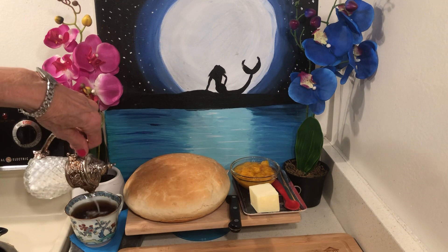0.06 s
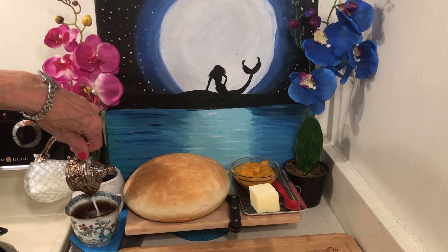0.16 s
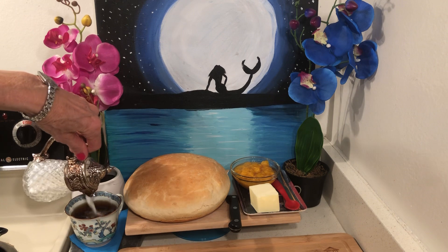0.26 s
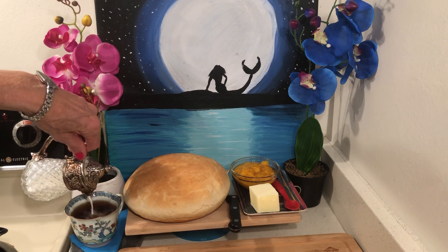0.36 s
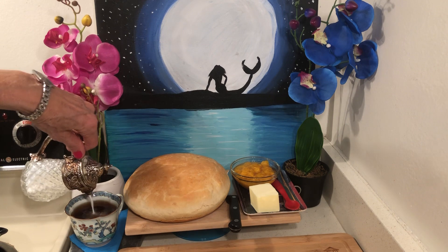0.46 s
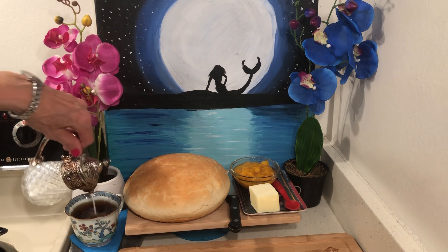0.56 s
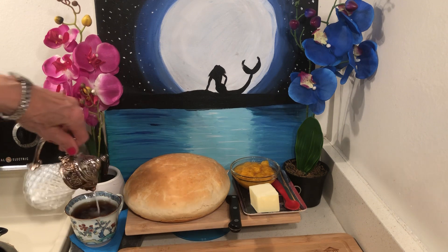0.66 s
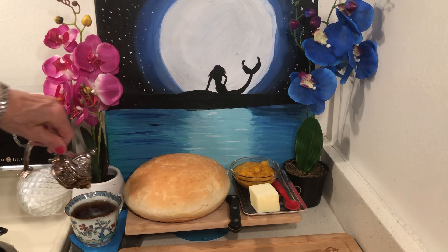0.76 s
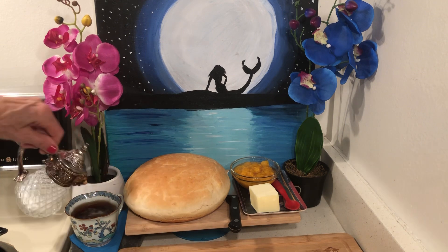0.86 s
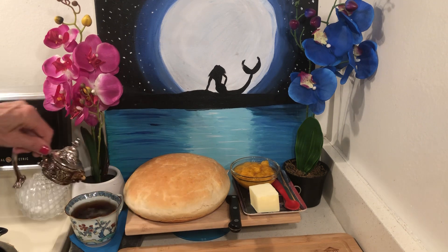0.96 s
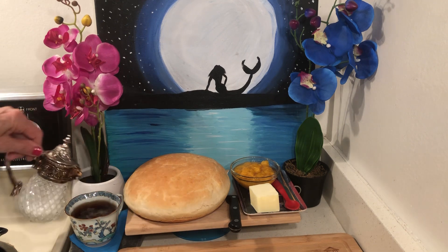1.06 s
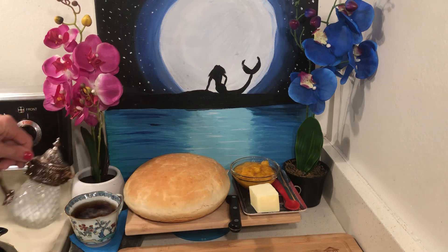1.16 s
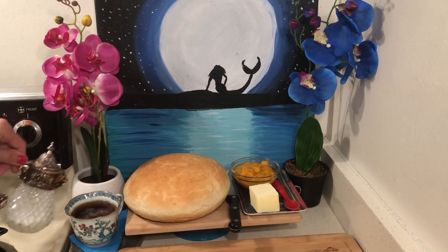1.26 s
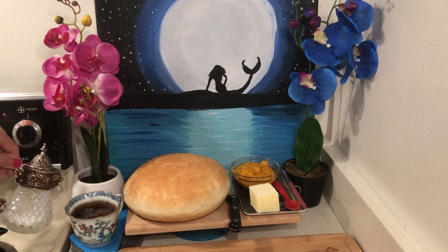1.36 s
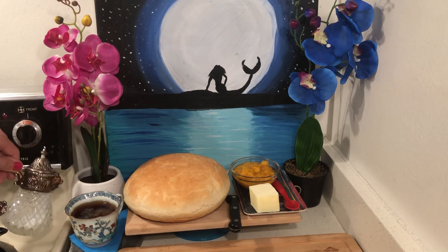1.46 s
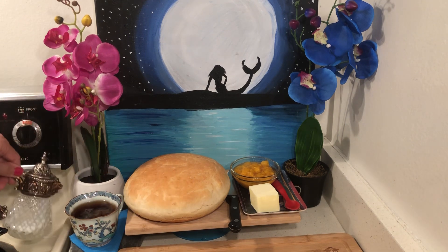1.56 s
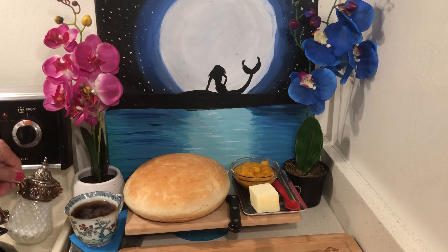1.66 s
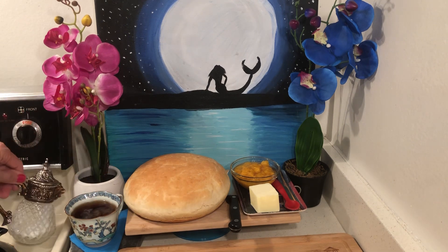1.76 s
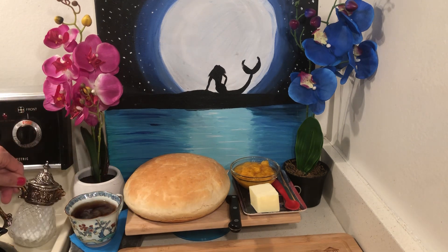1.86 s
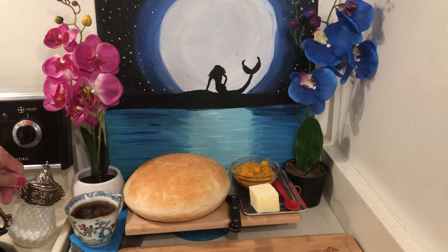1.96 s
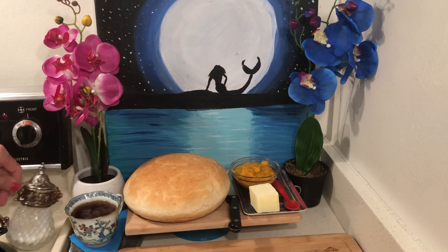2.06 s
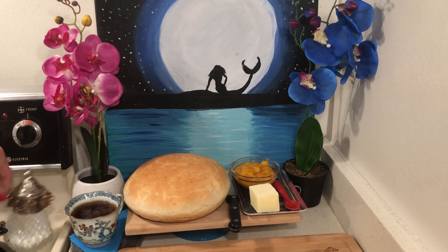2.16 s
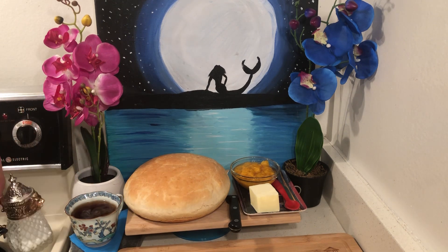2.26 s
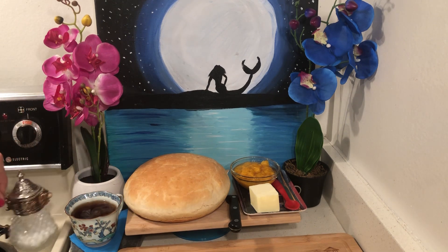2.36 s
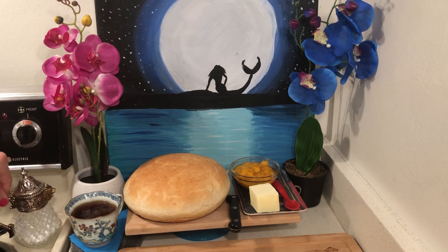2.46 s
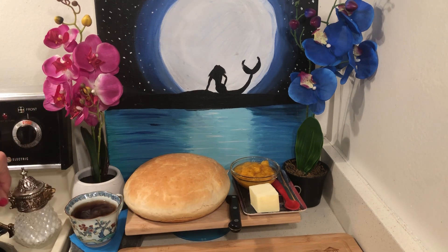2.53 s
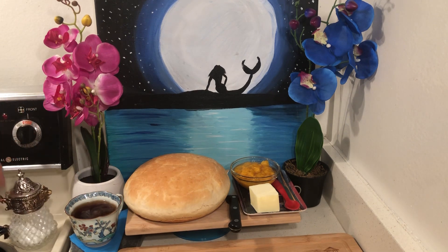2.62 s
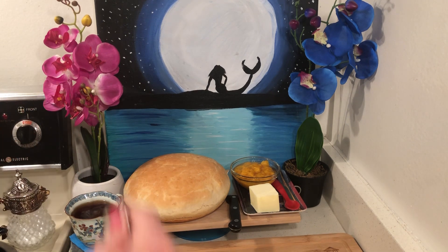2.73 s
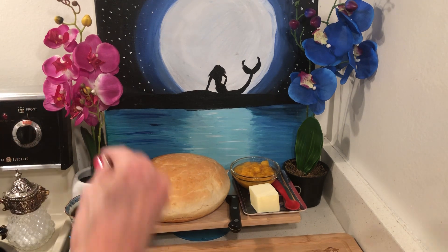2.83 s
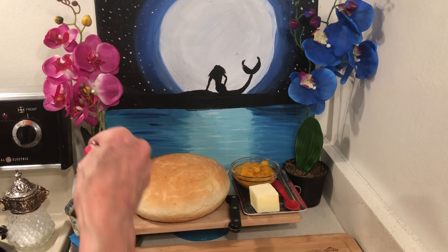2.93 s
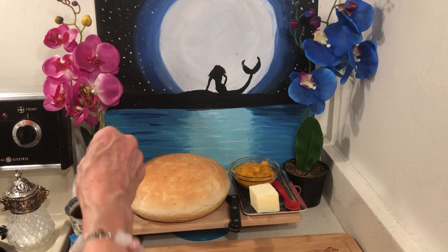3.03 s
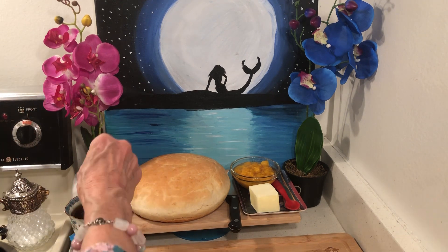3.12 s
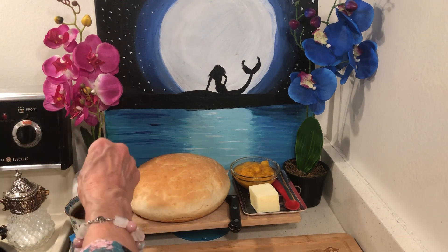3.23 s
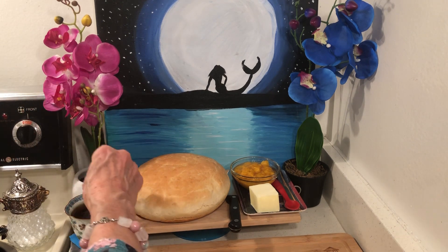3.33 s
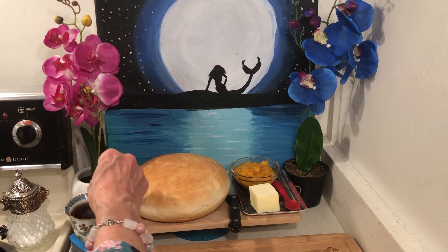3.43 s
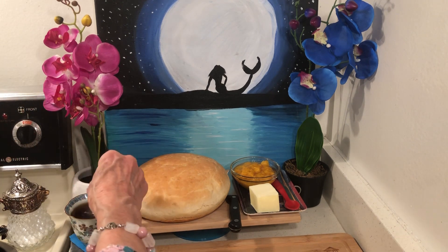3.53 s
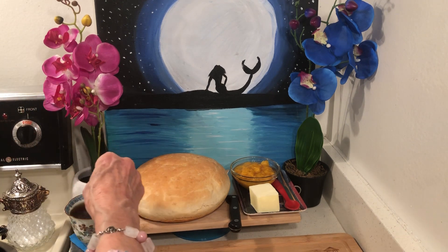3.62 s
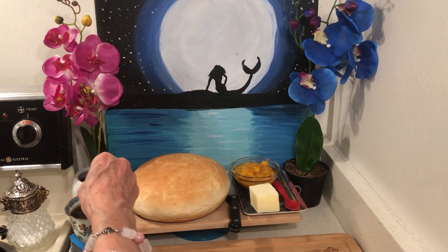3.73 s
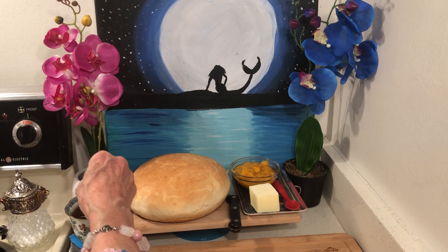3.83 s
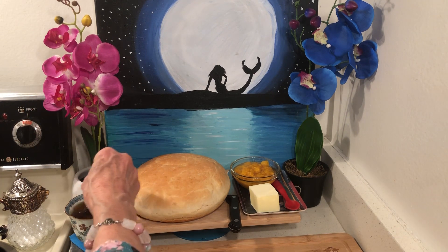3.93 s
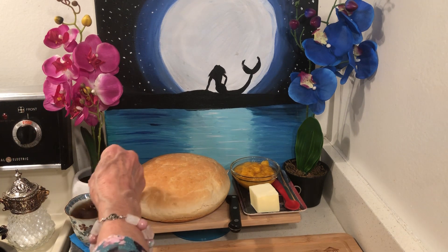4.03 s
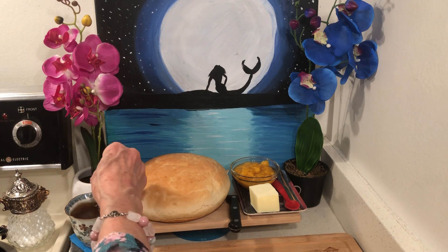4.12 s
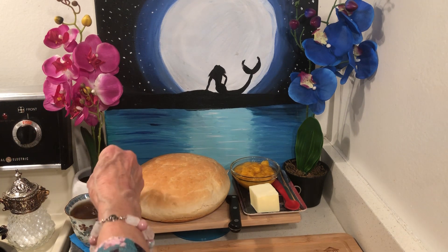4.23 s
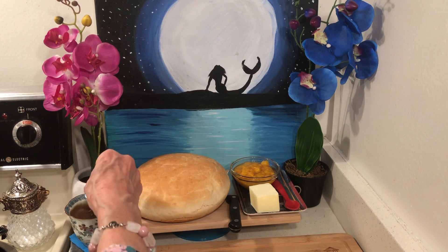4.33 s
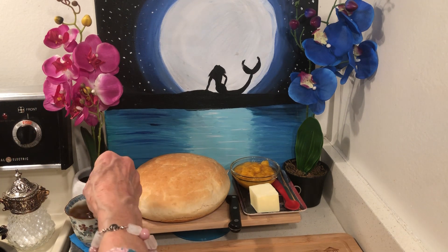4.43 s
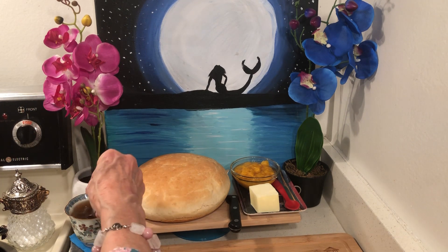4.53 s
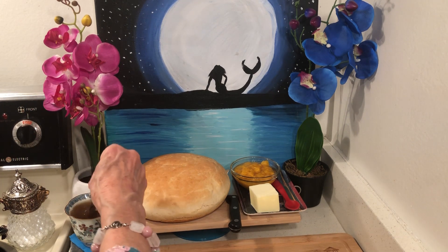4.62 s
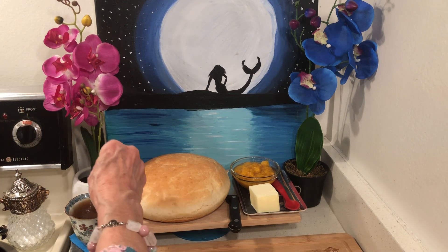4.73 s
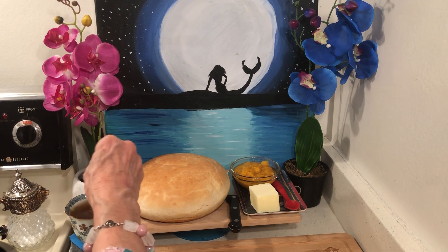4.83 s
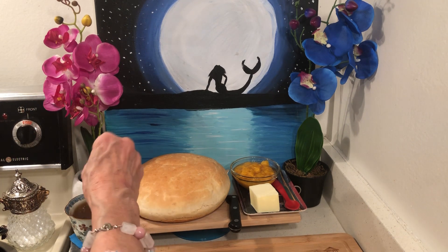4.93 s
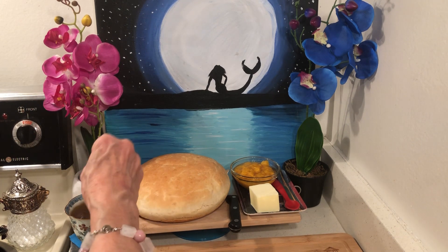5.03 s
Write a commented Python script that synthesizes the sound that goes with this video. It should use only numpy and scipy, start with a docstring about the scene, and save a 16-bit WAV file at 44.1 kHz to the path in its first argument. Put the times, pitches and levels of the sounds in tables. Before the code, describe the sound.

Last tea drops plink into a china cup, a small metal-lidded pot claps and thuds onto a counter, then a spoon chinks and stirs.

```python
"""Over air noise and an appliance hum near a kitchen corner, the last drops of tea fall into a china cup. A
small glass and metal teapot is tipped upright, its lid falls shut; it is set down, rocks and slides. Then a
spoon chinks the cup, knocks its bottom and stirs while a bracelet ticks. Lid, cup and links are dying sines,
drops and stirring plops are rising bubble tones, knocks are paired contacts of modes and rattle, rubs are dense
noise."""
import sys
import numpy as np
from scipy import signal
from scipy.fft import rfft, irfft
from scipy.io import wavfile

SR = 44100
rng = np.random.default_rng(int(sys.argv[2]) if len(sys.argv) > 2 else 0)


def inscribe(sig):
    """Save sig as 16-bit PCM at rate SR to the path in sys.argv[1].

    A 1-D sig is mono; a 2-D sig holds one channel per row.
    Samples are clipped to [-1, 1] before scaling.
    """
    pcm = np.round(np.clip(np.atleast_2d(sig).T, -1, 1) * 32767)
    wavfile.write(sys.argv[1], SR, pcm.astype(np.int16))


N = 224142

# Steady air noise. Each row: frequency in Hz, relative level in dB per Hz.
AIR_SPECTRUM = [(20, -18), (45, -14.5), (80, 5), (130, -5.5), (180, -2.5), (270, 2), (340, -5), (420, -2.5),
                (600, -6.5), (1200, -9.5), (2500, -19.5), (6000, -27.5), (10000, -37.5), (16000, -42)]
# Appliance hum. Each row: frequency in Hz, level in dB rms, width of the wavering in Hz.
HUM_TONES = [(45, -75, 3), (119.8, -56, 9.9), (151.6, -63.5, 2.5), (228, -57, 0.12), (273.6, -67.5, 5.5),
             (415.8, -62, 4.7), (440, -76, 0.85)]
# Kitchen reverberation. Each row: frequency in Hz, time to fall by 60 dB in seconds.
ROOM_DECAY = [(70, 0.88), (150, 0.9), (300, 0.37), (700, 0.35), (1800, 0.32), (5000, 0.3), (13000, 0.18)]
# A tiny hard contact. Each row: frequency in Hz, relative level in dB.
TICK_SPECTRUM = [(300, -92), (1500, 4.5), (3300, 9.5), (6000, 1), (9000, 1.5), (13000, -2.5), (16000, -7)]
# The clearest bracelet ticks. Each row: start in seconds, level in dB.
LINK_TICKS = [(3.706, -51), (3.8452, -69), (4.0897, -60.5), (4.1859, -66), (4.3257, -60.5), (4.7054, -62.5)]
# Link resonances before each link's own detuning. Each row: frequency in Hz, relative level in dB,
# time to fall by 60 dB in seconds.
LINK_MODES = [(7400, -4, 0.039), (8320, -8, 0.04), (9200, -5, 0.037), (9830, 0, 0.082), (11200, 3.5, 0.03),
              (12400, -1, .035), (14000, 3, 0.031), (15100, -2, 0.02)]
# Bubbles in the tea. Each row: start in seconds, nominal pitch in Hz, level in dB.
BUBBLES = [(0.0977, 4170, -59), (0.2022, 2270, -59.5), (0.301, 2690, -54), (0.419, 2640, -63),
           (0.4957, 3450, -54.5), (.531, 1870, -53), (0.792, 6460, -68.5), (3.936, 2085, -56.5),
           (3.939, 4120, -66), (3.983, 4200, -67)]
# Spoon on the cup. Each row: start in seconds, ring level in dB, tick level in dB.
SPOON_CHINKS = [(3.468, -41, -43.5), (3.508, -52, -65), (3.7095, -65, -69), (3.845, -69, -60),
                (4.186, -72, -80)]
# Cup modes. Each row: frequency in Hz, relative level in dB, time to fall by 60 dB in seconds.
CUP_MODES = [(1416, -8, .25), (3348, -2, .29), (3412, 0, .15), (5211, -7, .3), (6002, -11, .18),
             (6799, -16, .18), (8118, -10, .18), (8290, -6, .08), (10300, -16, .14), (11460, -14, .1),
             (14560, -14, .09)]
# The lid falling shut. Each row: start in seconds, ring level in dB, knock level in dB.
LID_CLAPS = [(1.364, -41, -34)]
# Lid modes. Each row: frequency in Hz, relative level in dB, time to fall by 60 dB in seconds.
LID_MODES = [(505, 0, .12), (673, -2, .13), (1098, -2, .17), (1170, -4, .08), (1680, 4, .12),
             (2562, -11, .27), (3080, -7.5, .22), (3200, 2, .05), (4280, -7, .25), (4410, -3, .08),
             (4544, -10, .2), (5520, 1, .06), (5590, -6, .15), (7246, -19, .16), (8608, -22, .14),
             (11430, -27, .12)]
# The lid's hinge settling. Each row: start in seconds, ring level in dB, tick level in dB.
HINGE_SETTLES = [(1.833, -56.5, -61)]
# Hinge modes. Each row: frequency in Hz, relative level in dB, time to fall by 60 dB in seconds.
HINGE_MODES = [(4370, -6.5, 0.094), (5992, -1, 0.07), (6130, 3, 0.077), (7970, -9, .14), (9600, -15, .08),
               (10940, -18, .1)]
# The cabinet booming after the heavy blows. Each row: start in seconds, level in dB.
CABINET_BOOMS = [(1.955, -38), (2.331, -42)]
# The foot rubbing as the pot rocks, then sliding into place. Each row: start in seconds, length in seconds,
# level in dB, treble tilt in dB per octave.
FOOT_SLIDES = [(2.262, 0.33, -50.5, 0), (2.626, 0.15, -39, -5)]
# Knocks that reach the counter, from the pot and last (two rows) from the spoon on the cup's bottom, each
# two contacts. Each row: start in seconds, level of the second contact in dB, gap to it in seconds,
# first contact in dB above the second, mode blend from 0 for the pot's edge to 1 for its flat foot.
COUNTER_KNOCKS = [(1.7438, -35.5, .0093, -5, 0.29), (1.951, -23, 0.0051, 2.5, 0.077),
                  (2.3129, -21, 0.014, -12, 0.8), (2.4199, -30.5, 0.013, -5, 0.93),
                  (2.489, -38.5, 0.0031, 2.5, 1), (2.5017, -25.5, .005, -6, 1),
                  (2.6131, -40.5, 0.0012, -0.5, 0.92), (2.66, -41, .011, 1.5, 0.65),
                  (3.4102, -47.5, 0.02, 3.5, 0.11), (3.843, -59, 0.0011, 6, 0.37)]
# Pot and counter ringing together, before a treble lift. Each row: frequency in Hz,
# relative level in dB struck on the edge, relative level in dB struck on the foot.
KNOCK_MODES = [(158, 7, -2), (291, 4, -2), (377, 8, -2), (435, 3, 0), (581, 8, 5), (688, 5, 2),
               (951, -1, -4), (1087, 2, -4), (1175, -5, 4), (1256, -3, -2), (1339, -3, -4), (1447, 7, -2),
               (1546, -1, -11), (1713, -1, -1), (2015, 6, -8), (2280, 4, -5), (2394, -3, -10),
               (2992, -3, -6), (3058, -4, -5), (3320, -4, -6), (3531, -6, -4), (3798, -2, -13),
               (3854, -4, -17), (4067, -3, -15), (4587, -5, -15), (5424, -6, -18), (5830, -4, -16),
               (6592, -6, -13), (6712, -5, -25)]
# The dense, short rattle of a blow. Each row: frequency in Hz, relative level in dB.
RATTLE_SPECTRUM = [(40, -40), (80, -4.5), (200, -4), (550, 4.5), (850, 0.5), (1300, -2), (2500, -7.5),
                   (3500, -11), (6000, -13.5), (10000, -19), (16000, -29)]

T = np.arange(SR // 2) / SR  # seconds since a blow
CLOCK = np.arange(N) / SR  # seconds since the start
CUTOFF_HZ = 15950

# Soft high hiss as the arm reaches over.
REACH_S, REACH_LENGTH_S, REACH_DB, REACH_RISE_S, REACH_FALL_S = 2.58, 1, -71.5, 0.15, .5
# Stirring: the spoon rubs steadily; the bracelet jingles until the wrist settles.
STIR_S, STIR_RISE_S, RUB_DB = 3.48, .06, -70
JINGLE_LENGTH_S, JINGLE_FALL_S, JINGLE_DB = 1.4, 0.86, -82.5
# The jingle is so dense that it shimmers: average touches of each link.
TOUCHES_PER_S = 51
# While the spout drips, each bubble comes with a tick of splash.
POUR_END_S, SPLASH_DB = .6, -62.5
# The lid is not quite round, so each mode has a twin higher by a share of its pitch.
TWIN_SHARE, TWIN_DB = 0.0168, -1.5
SLIPS_PER_S, SLIDE_RISE_S, SLIDE_FALL_S = 1200, 0.036, 0.084
# Harder knocks are brighter and boomier: treble tilt (dB per octave) and bass (dB) of a medium knock,
# and their growth per dB of force.
MEDIUM_DB = -30
TILT_DB, TILT_PER_DB = -4, 0.5362
BASS_DB, BASS_PER_DB = -3, 0.22
# The first contact is thinner than the second: extra tilt in dB per octave, extra bass in dB.
FIRST_TILT_DB, FIRST_BASS_DB = 0.5, -6


def amp(db):
    """Decibels to gain."""
    return 10 ** (np.asarray(db) / 20)


def unit(x):
    """Scales a sound to rms 1."""
    return x / np.sqrt(np.mean(x ** 2) + 1e-20)


def unit_hit(x):
    """Scales a hit so that its energy equals 15 ms at rms 1."""
    return x / np.sqrt(np.sum(x ** 2) / (.015 * SR))


def unit_energy(x):
    """Scales a sound so that its squared samples sum to 1."""
    return x / np.linalg.norm(x)


def read(points, hz):
    """Reads a spectrum table along a log-frequency axis."""
    f, value = np.transpose(points)
    return np.interp(np.log(hz + 1), np.log(f + 1), value)


def tilt(db_per_octave, hz, corner_hz):
    """A treble slope in dB that sets in above the corner."""
    return db_per_octave * np.log2(np.hypot(1, hz / corner_hz))


def colour(x, db_at):
    """Causal, minimum-phase filter whose gain is a function of frequency."""
    size = 4096
    hz = abs(np.fft.fftfreq(size, 1 / SR))
    log_gain = np.log(amp(db_at(hz)))
    spectrum = np.exp(np.conj(signal.hilbert(log_gain)))
    taps = np.fft.ifft(spectrum).real
    return signal.fftconvolve(x, taps[:size // 2])[:len(x)]


def add(mix, s, sound):
    """Mixes a sound in at time s."""
    part = mix[max(round(s * SR), 0):][:len(sound)]
    part += sound[:len(part)]


def stroke(start_s, length_s, rise_s, fall_s):
    """Gain of one movement: it rises, holds and falls to silence."""
    t = CLOCK - start_s
    return np.clip(t / rise_s, 0, 1) * np.clip((length_s - t) / fall_s, 0, 1)


def random_touches(per_s):
    """Sparse impulses of random strength at random moments, scaled to rms 1."""
    return unit(rng.standard_normal(N) * (rng.random(N) < per_s / SR))


def shaped_noise(gain):
    """Noise of rms 1 with the given gain at each frequency."""
    return unit(irfft(rfft(rng.standard_normal(N)) * gain, N))


def scatter(tail_db):
    """A click as it arrives: direct, off counter and walls a few ms later, then the room's tail."""
    echoes = [(0, 9, .0016), (.0028, 11, 0.0011), (.0075, -2, .007)]  # (delay s, dB, spread s)
    early = sum(amp(db) * (T >= delay) * np.exp(-abs(T - delay) / spread) for delay, db, spread in echoes)
    hz, t, bands = signal.stft(rng.standard_normal(len(T)), SR, nperseg=256)
    fading = bands * amp(-60 * t / read(ROOM_DECAY, hz)[:, None])
    tail = signal.istft(fading, SR, nperseg=256)[1][:len(T)]
    tail_rise = 1 - np.exp(-T / 0.005)
    return early * rng.standard_normal(len(T)) + amp(tail_db) * tail * tail_rise


def ring(modes, rise_s):
    """Dying sines that build up as the first reflections join in."""
    hz, db, t60 = np.transpose(modes)[:, :, None]
    phase = rng.random(hz.shape)
    sines = amp(db - 60 * T / t60) * np.sin(2 * np.pi * (hz * T + phase))
    return sines.sum(0) * (1 - np.exp(-T / rise_s))


def in_room(x, wet_db):
    """Adds scattered reflections to a ringing sound."""
    echo = unit_energy(scatter(tail_db=-10))
    return x + amp(wet_db) * signal.fftconvolve(x, echo)[:len(x)]


def tick(tail_db):
    """A tiny hard contact: a scattered click with a bright spectrum."""
    return unit_hit(colour(scatter(tail_db), lambda hz: read(TICK_SPECTRUM, hz)))


def rattle(tail_db):
    """The dense rattle of a blow: a scattered click, too crowded to hear single modes."""
    return unit_hit(colour(scatter(tail_db), lambda hz: read(RATTLE_SPECTRUM, hz)))


def background():
    """Steady air noise, hum tones that waver by narrow noise, and a soft hiss of movement."""
    hz = np.fft.rfftfreq(N, 1 / SR)
    out = amp(-54.5) * shaped_noise(amp(read(AIR_SPECTRUM, hz)))
    for f, db, width in HUM_TONES:
        tone = np.sin(2 * np.pi * (f * CLOCK + rng.random()))
        waver = 0.12 * width * shaped_noise(1 / (1 + ((hz - f) / width) ** 2))
        out += amp(db) * unit(tone + waver)
    reach = amp(REACH_DB) * stroke(REACH_S, REACH_LENGTH_S, REACH_RISE_S, REACH_FALL_S)
    return out + reach * shaped_noise(amp(read(TICK_SPECTRUM, hz)))


def fizz():
    """The very bright, toneless part of a link's tick."""
    return unit_hit(colour(scatter(tail_db=-3),
                           lambda hz: read(TICK_SPECTRUM, hz) - 22 / (1 + (hz / 7000) ** 4)))


def link():
    """One small link ticking; each is tuned a little differently."""
    hz, mode_db, t60 = np.transpose(LINK_MODES)
    detune, weight = rng.standard_normal((2, len(LINK_MODES)))
    modes = np.transpose([hz * (1 + .02 * detune), mode_db + 3 * weight, t60])
    chime = unit_hit(in_room(ring(modes, rise_s=0.00046), wet_db=-16))
    return amp(-2.5) * chime + amp(-8.5) * fizz()


def bracelet():
    """A few clear ticks, and a faint jingle from six links touching at random."""
    out = np.zeros(N)
    for s, db in LINK_TICKS:
        add(out, s, amp(db) * link())
    shake = amp(JINGLE_DB) * stroke(STIR_S, JINGLE_LENGTH_S, STIR_RISE_S, JINGLE_FALL_S)
    for _ in range(6):
        touches = random_touches(TOUCHES_PER_S) * shake
        out += signal.oaconvolve(touches, unit_energy(link()))[:N]
    return out


def tea_bubbles():
    """A drop ticks on the surface and traps a bubble whose pitch rises as it dies; later the stirring spoon
    raises a few bubbles without a tick."""
    out = np.zeros(N)
    for s, hz, db in BUBBLES:
        pitch_hz = hz * (1.018 + 0.027 * (1 - np.exp(-T / 0.022)))
        turns = np.cumsum(pitch_hz) / SR
        bubble = np.sin(2 * np.pi * turns) * np.exp(-turns / 7) * (1 - np.exp(-turns))
        add(out, s, amp(db) * unit_hit(in_room(bubble, wet_db=7.0)))
        if s < POUR_END_S:
            add(out, s, amp(SPLASH_DB) * tick(tail_db=-7))
    return out


def cup():
    """The spoon chinks the china wall, then rubs softly along it with a trace of the lowest modes."""
    out = np.zeros(N)
    for s, ring_db, tick_db in SPOON_CHINKS:
        chime = in_room(ring(CUP_MODES, rise_s=.0015), wet_db=-7)
        add(out, s, amp(ring_db) * chime + amp(tick_db) * tick(tail_db=-8))
    rub = colour(tick(tail_db=-6), lambda hz: tilt(-6, hz, 3000))
    wall = unit_hit(rub) + amp(-11) * unit_hit(ring(CUP_MODES[:3], rise_s=.002))
    stirring = amp(RUB_DB) * np.clip((CLOCK - STIR_S) / STIR_RISE_S, 0, 1)
    return out + stirring * unit(signal.oaconvolve(rng.standard_normal(N), wall)[:N])


def lid():
    """The metal lid claps on the rim and rings in beating pairs; later its hinge settles."""
    out = np.zeros(N)
    twins = [(hz * (1 + TWIN_SHARE), db + TWIN_DB, t60) for hz, db, t60 in LID_MODES]
    modes = np.concatenate([LID_MODES, twins])
    for s, ring_db, knock_db in LID_CLAPS:
        clap = colour(rattle(tail_db=-5.0), lambda f: tilt(-3.2, f, 2500) - 6 / (1 + (f / 300) ** 2))
        chime = in_room(ring(modes, rise_s=0.00031), wet_db=-2)
        add(out, s, amp(ring_db) * chime + amp(knock_db) * clap)
    for s, ring_db, tick_db in HINGE_SETTLES:
        tink = in_room(ring(HINGE_MODES, rise_s=0.00089), wet_db=5.0)
        add(out, s, amp(ring_db) * tink + amp(tick_db) * tick(tail_db=1))
    return out


def cabinet():
    """The low panels under the counter take a while to swing up: slowly swelling low noise."""
    out = np.zeros(N)
    low_band = signal.butter(3, [58, 100], "bandpass", fs=SR, output="sos")
    swell = (T / .07) ** 3 * np.exp(-3 * T / .07)  # fullest after 70 ms
    for s, db in CABINET_BOOMS:
        rumble = signal.sosfilt(low_band, rng.standard_normal(len(T)))
        add(out, s, amp(db) * unit_hit(swell * rumble))
    return out


def knock(tilt_db, bass_db, spot):
    """The spot blends the modes; a harder contact is brighter, a heavier one has more bass."""
    hz, edge_db, foot_db = np.transpose(KNOCK_MODES)
    spot_db = edge_db + np.clip(spot, 0, 1) * (foot_db - edge_db)
    mode_db = spot_db + 1.24 * np.log2(hz / 1000)
    t60 = 0.15 * (hz / 1000) ** -.35  # high modes die sooner
    modes = np.transpose([hz, mode_db, t60])
    body = unit_hit(in_room(ring(modes, rise_s=0.0014), wet_db=-22))
    blow = amp(-1.0) * rattle(tail_db=-3.5) + amp(-4.5) * body
    return unit_hit(colour(blow, lambda f: tilt(tilt_db, f, 1600) + bass_db / (1 + (f / 900) ** 2)))


def slide():
    """The foot sticks and slips: a dense, uneven run of small blows."""
    out = np.zeros(N)
    for s, length_s, db, tilt_db in FOOT_SLIDES:
        slips = random_touches(SLIPS_PER_S) * stroke(s, length_s, SLIDE_RISE_S, SLIDE_FALL_S)
        body = unit_energy(knock(tilt_db, bass_db=3.5, spot=0.97))
        out += amp(db) * signal.fftconvolve(slips, body)[:N]
    return out


def counter_knocks():
    """Pot knocks, then dull spoon knocks through the cup's bottom, each two contacts; force sets the colour."""
    out = np.zeros(N)
    for s, db, gap_s, first_db, spot in COUNTER_KNOCKS:
        force_db = db + max(first_db, 0) - MEDIUM_DB  # the stronger contact against a medium knock
        tilt_db = TILT_DB + TILT_PER_DB * force_db
        bass_db = BASS_DB + BASS_PER_DB * force_db
        first = knock(tilt_db + FIRST_TILT_DB, bass_db + FIRST_BASS_DB, spot)
        second = knock(tilt_db, bass_db, spot)
        add(out, s, amp(db + first_db) * first)
        add(out, s + gap_s, amp(db) * second)
    return out


def scene():
    """All sources summed into one channel."""
    small_sounds = bracelet() + tea_bubbles() + cup()
    heavy_sounds = lid() + cabinet() + slide() + counter_knocks()
    return (background() + small_sounds + heavy_sounds)[None]


def record(dry):
    """Rounds off the highest peaks and limits the band."""
    ceiling = .33
    rounded = ceiling * np.tanh(dry / ceiling)
    lowpass = signal.firwin(511, CUTOFF_HZ, window=("kaiser", 9), fs=SR)
    return signal.oaconvolve(rounded, lowpass[None], "same")


dry = scene()
out = record(dry)
inscribe(out)
```